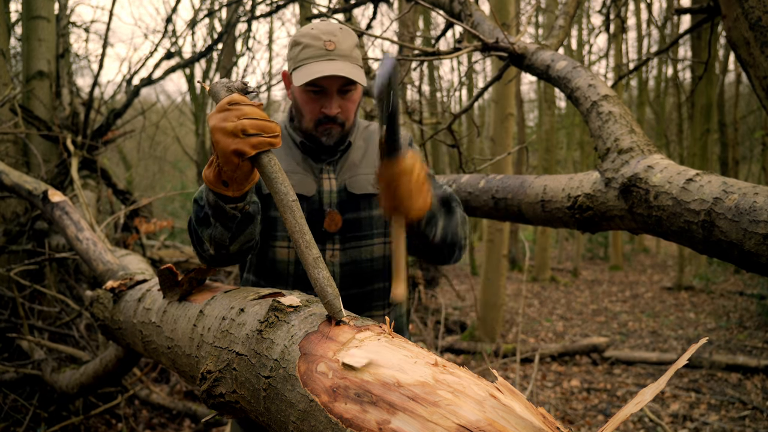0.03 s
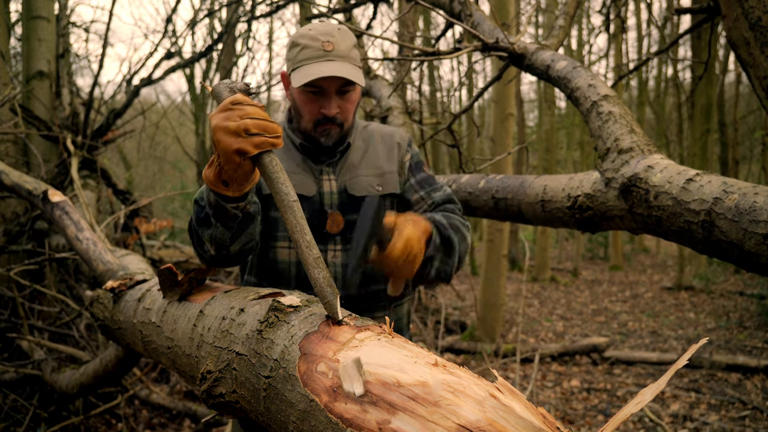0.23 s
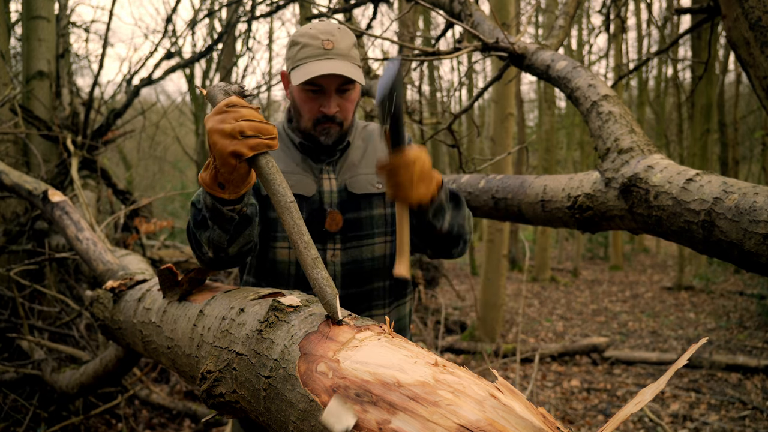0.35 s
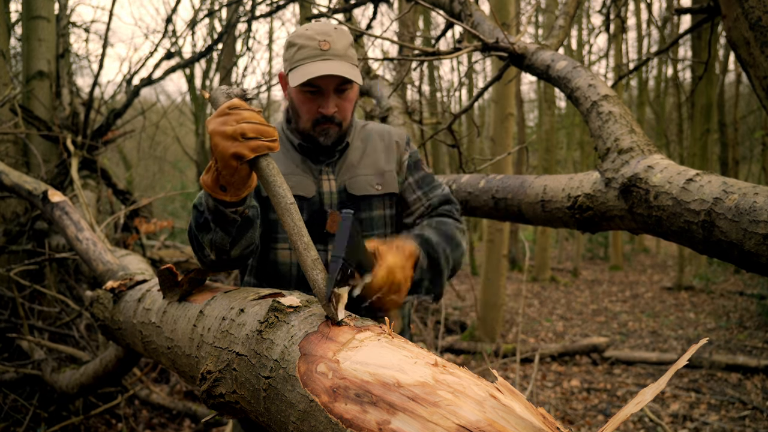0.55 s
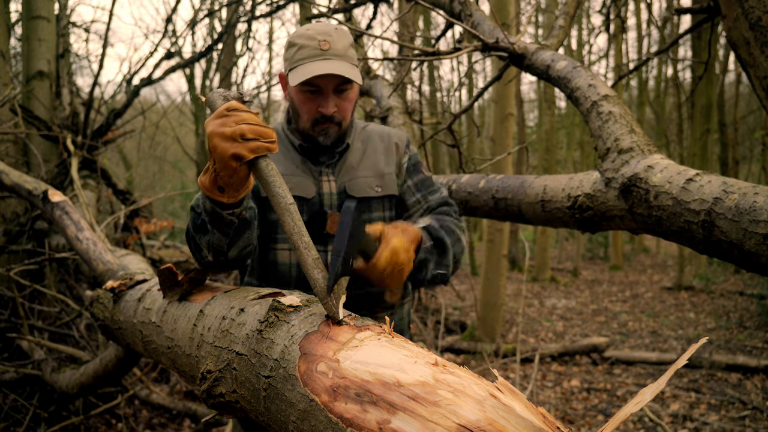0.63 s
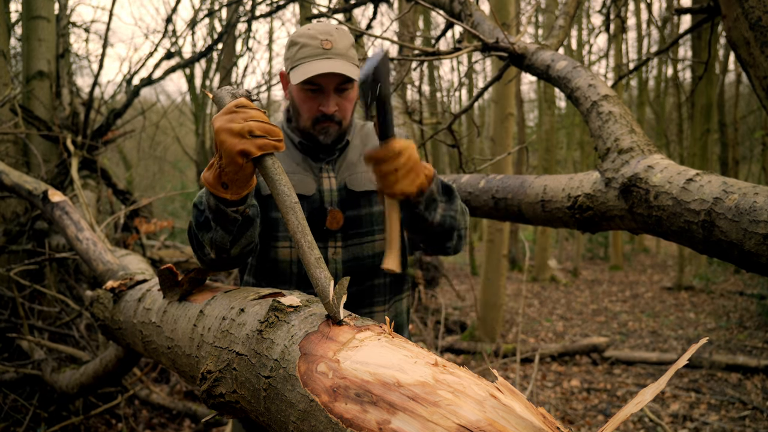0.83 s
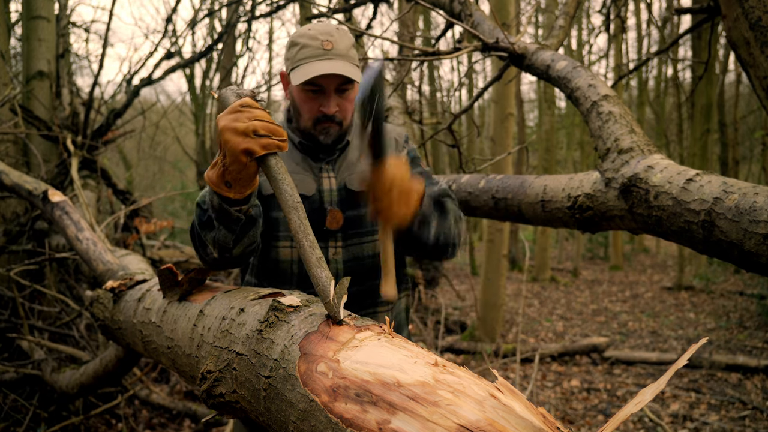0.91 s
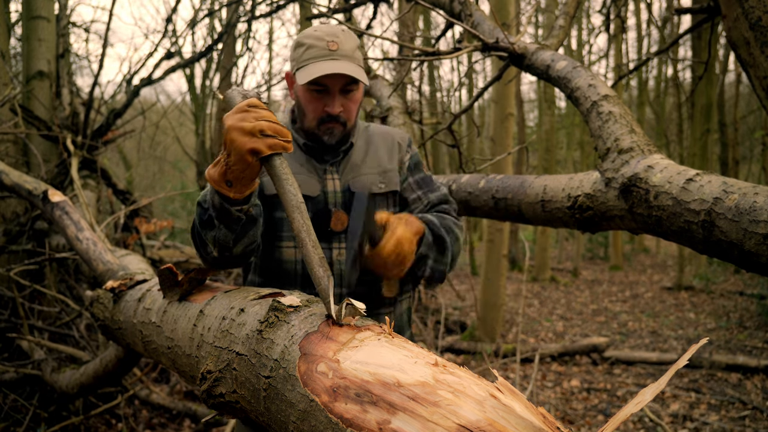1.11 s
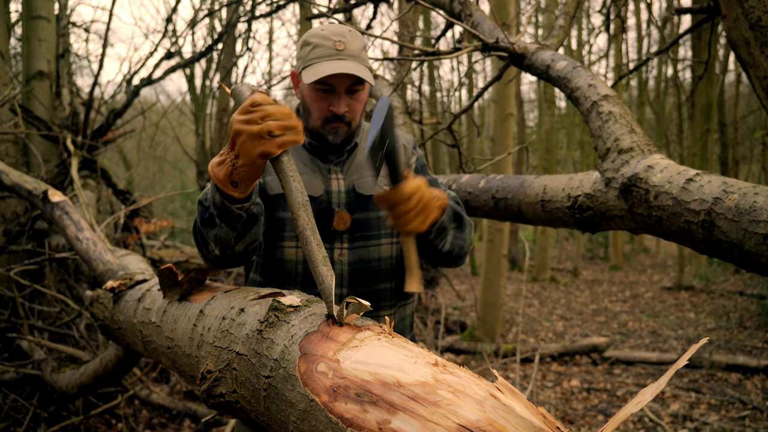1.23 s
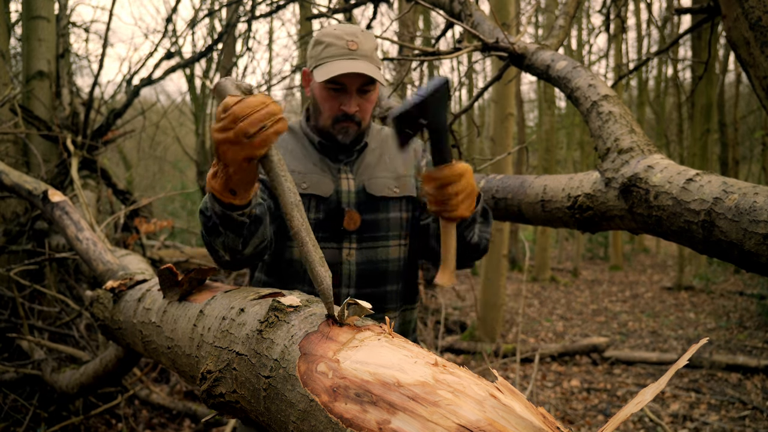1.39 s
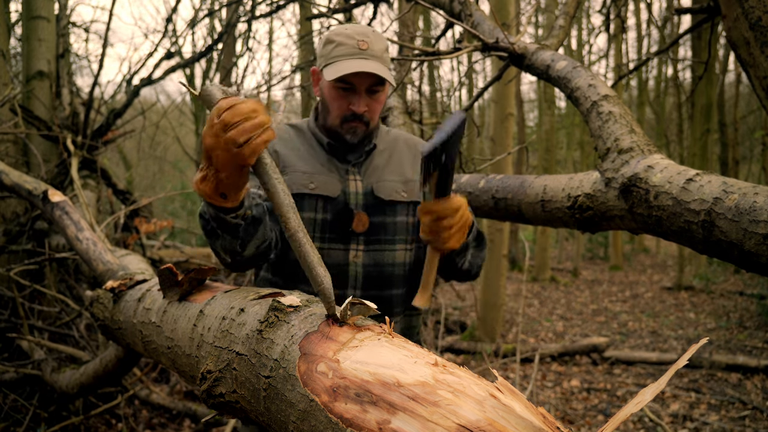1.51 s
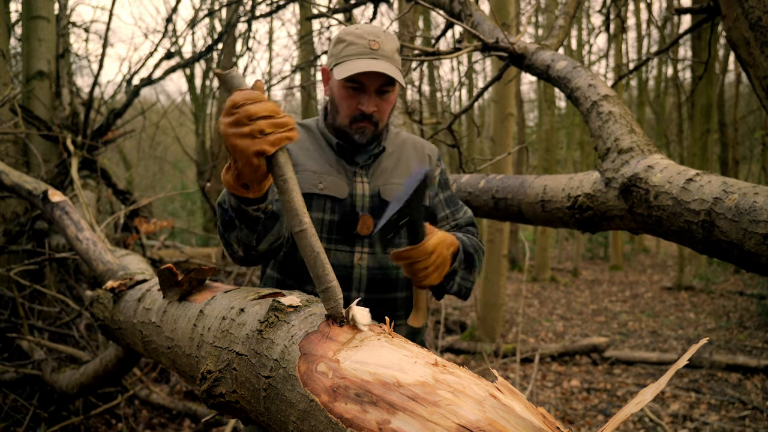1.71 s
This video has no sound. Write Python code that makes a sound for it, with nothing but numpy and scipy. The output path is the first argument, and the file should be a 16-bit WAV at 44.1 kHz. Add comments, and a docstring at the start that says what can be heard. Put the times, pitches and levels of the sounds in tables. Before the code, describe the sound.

Three crisp hatchet chops crack into wood, with small chips ticking down between the blows outdoors.

```python
"""In a woodland, a hatchet strikes a wooden stake three times on a log.
Each blow knocks stake and log, which ring as dying sines, and the edge tears fibres:
dense random cracks and single snaps excite a ring and a hiss. Chips tick and scatter as they land,
the trees return a faint echo made of sparse taps, leaves and cloth rustle in fine grains,
and a far, dull wash of shaped noise lies underneath."""
import sys
import numpy as np
from scipy import signal
from scipy.io import wavfile
from scipy.ndimage import uniform_filter1d

SR = 44100
rng = np.random.default_rng(int(sys.argv[2]) if len(sys.argv) > 2 else 0)


def materialize(psi):
    """Save the field psi as 16-bit PCM at rate SR to the path in sys.argv[1].

    A 1-D psi becomes a single channel; in a 2-D psi each row is a channel.
    """
    bounded = np.clip(np.atleast_2d(psi).T, -1, 1)
    quanta = np.round(bounded * 32767).astype(np.int16)
    wavfile.write(sys.argv[1], SR, quanta)


def gain_from_db(level_db):
    """Turn a decibel level (scalar or array-like) into a linear amplitude factor."""
    decades = np.asarray(level_db, float) / 20
    return 10 ** decades


N = 77175  # length of the scene in samples (1.75 s)


def evened(x):
    """Scales a sound to an average strength (rms) of 1."""
    return x / np.sqrt(np.mean(x ** 2) + 1e-20)


def read(points, hz):
    """Reads a table by pitch, with straight lines between points on a log-frequency axis."""
    f, value = np.transpose(points)
    return np.interp(np.log(hz + 1), np.log(f + 1), value)


def curve(points):
    """Reads a table by time, giving one value for every sample."""
    return np.interp(np.arange(N) / SR, *np.transpose(points))


def add(mix, start_s, sound):
    """Mixes a sound in at its start time, cutting what runs past the end."""
    part = mix[round(start_s * SR):][:len(sound)]
    part += sound[:len(part)]


def causal(x, spectrum):
    """Filters with the given spectrum; minimum phase, so nothing sounds before its cause."""
    hz = abs(np.fft.fftfreq(4096, 1 / SR))
    gain_db = np.maximum(read(spectrum, hz), -100)
    log_gain = np.log(gain_from_db(gain_db))
    taps = np.fft.ifft(np.exp(np.conj(signal.hilbert(log_gain)))).real[:2048]
    return signal.oaconvolve(x, taps)[:len(x)]


def coloured(x, spectrum):
    """Filters with the given spectrum, then scales to rms 1."""
    return evened(causal(x, spectrum))


def crackle(size, per_s, spread_db):
    """Makes random clicks of either sign, a few of them large."""
    chance, rarity, side = rng.random((size, 3)).T
    click_size = gain_from_db(spread_db * np.minimum(-np.log(rarity + 1e-9), 4))
    return (chance < per_s / SR) * click_size * np.sign(side - .5)


def ringing(modes):
    """Sums the dying sines of a struck body, each with its own pitch, level and decay."""
    t = np.arange(SR // 4) / SR
    return sum(gain_from_db(db - 60 * t / t60) * np.sin(2 * np.pi * hz * t) for hz, db, t60 in modes)


def burst(hz, cycles):
    """Makes a ring that swells and dies within a few cycles."""
    turns = np.arange(1500) * hz / SR
    u = 4.0 * turns / max(cycles, .5)
    return u * np.exp(1 - u) * np.sin(2 * np.pi * turns)


# How stake and log ring when struck: pitch_hz, level_db, t60_s (time to fall by 60 dB)
WOOD_MODES = [(115, -6, .14), (160, -8, .14), (245, -3, .1), (200, -8, .13), (345, -7, .11), (440, -2, .04),
              (520, 0, .04), (630, -3, .04), (830, -6, .025), (950, -5, .025), (1150, -6, .025),
              (1570, -2, .03), (1940, -9, .02), (2400, -10, .015)]
# Knocks of blade on stake and stake on log:
# start_s, peak_db, contact_s, best_hz (modes hit best), breadth_octaves (around best_hz)
BLOW_KNOCKS = [(.2364, -18, .0012, 600, 1.2), (0.2426, -20, 0.0015, 400, 1.), (.2469, -7, .0011, 520, 1.2),
               (0.2523, -19, 0.00088, 800, 1.3), (0.2604, -21, 0.0014, 550, .8),
               (.286, -37, 0.0018, 345, .6), (.6678, -13, .0006, 800, 1.4), (.6715, -21, .001, 600, 1.1),
               (.684, -36, .002, 170, .9), (1.1021, -19, 0.00048, 950, .2), (1.1035, -17, .0004, 1570, .25),
               (1.1045, -18, .0009, 450, .2), (1.1248, -31, .0018, 250, 1.), (0.8516, -51, .0012, 400, 1.),
               (1.3935, -47, .0005, 1000, 1.1), (1.401, -49, .0005, 1200, .9), (.33, -44, .002, 220, .9)]


def knock(peak_db, contact_s, best_hz, octaves):
    """A smooth push during contact rings the wood, most strongly in the modes near best_hz."""
    detune = .015  # each knock meets the wood a little differently (fraction of pitch)
    force = np.sin(np.pi * np.minimum(np.arange(200) / SR / contact_s, 1)) ** 2
    push = np.diff(force)
    hz, db, t60 = np.transpose(WOOD_MODES)
    octaves_away = np.log2(hz / best_hz)
    db = db - 6.0 * (octaves_away / max(octaves, .15)) ** 2
    hz = hz * (1 + detune * rng.standard_normal(len(hz)))
    sound = np.convolve(ringing(zip(hz, db, t60)), push)
    return gain_from_db(peak_db) * sound / abs(sound).max()


# Single loud fibre snaps: start_s, level_db, pitch_hz, length_cycles
FIBRE_SNAPS = [(.2383, -15, 3100, 6.), (.2405, -13, 3300, 8.), (.2471, -17, 3500, 5.),
               (.6696, -12, 6800, 6.), (.6702, -15, 3400, 8.), (.6722, -8, 4500, 1.6),
               (.6737, -6, 4300, 1.6), (1.1082, -14, 3340, 14.), (1.1145, -18, 3400, 9.),
               (1.118, -18, 5400, 10.)]


def snap(level_db, pitch_hz, cycles):
    """One fibre breaks with a ring of a few cycles."""
    return gain_from_db(level_db) * burst(pitch_hz, cycles)


# Colour of the splinter hiss: pitch_hz, level_db (per Hz; only the shape counts)
SPLINTER_COLOUR = [(710, -44.5), (1200, -17), (2170, -22), (3050, 1), (3400, 7), (4000, -0.5), (5120, -5.5),
                   (7060, -5), (10800, -27.5), (14500, -43), (15600, -61.5)]
# The edge tearing through wood: start_s, length_s, level_db, ring_hz, hiss_db (against the ring)
WOOD_TEARS = [(.2355, .002, -36, 3100, 0), (.2376, .007, -18, 3150, 1.5), (0.2436, .0045, -26, 3310, -6),
              (.667, .002, -27, 3500, 2), (.669, .005, -24, 3418, 5), (0.6744, .0045, -32, 4200, 5),
              (1.1018, .002, -34, 4800, 0), (1.1037, .0075, -23, 3200, 0), (1.1113, .009, -25, 3350, 0),
              (1.1204, .0038, -33, 3250, 2)]


def tear(length_s, level_db, ring_hz, hiss_db):
    """Dense fibre cracks excite the blade's narrow ring and a wide splinter hiss."""
    rise_s, t60_s, ring_width_hz = .0008, .012, 380
    t = np.arange(2600) / SR
    cracks = crackle(len(t), per_s=12000, spread_db=3.0)
    ring = np.exp(-np.pi * ring_width_hz * t[:400]) * np.sin(2 * np.pi * ring_hz * t[:400])
    rung = evened(np.convolve(cracks, ring)[:len(t)])
    hiss = gain_from_db(hiss_db) * coloured(cracks, SPLINTER_COLOUR)
    fade_db = -60 * np.maximum(t - length_s, 0) / t60_s
    shape = np.minimum(t / rise_s, 1) * gain_from_db(level_db + fade_db)
    return shape * (rung + hiss)


# Colour of the scattering grit before each chip tilts it: pitch_hz, level_db (per Hz; only the shape counts)
GRIT_COLOUR = [(590, -32.5), (1000, -1.5), (2540, -2.5), (3630, -5.5), (4160, -3.5), (7150, -8.5),
               (10800, -19.5), (15600, -43.5)]
# Chips and bits of bark landing: start_s, level_db, ring_hz, scatter_t60_s,
# scatter_db (against level_db), treble_db (above -12 is brighter grit, below is duller)
CHIP_LANDINGS = [(.1304, -53, 1650, .03, -9, -16), (.5298, -52, 1890, .04, -9, -22),
                 (.6037, -38, 2450, .045, -9, -12), (.853, -51, 4500, .07, -3, -9),
                 (.9352, -36, 1845, .025, -15, -18), (.9425, -52, 2500, .05, -5, -12),
                 (.9635, -58, 5000, .035, -5, -10), (1.062, -57, 6000, .015, -6, -7),
                 (1.071, -54, 6000, .02, -6, -7), (1.2027, -49, 3530, .04, -6, -11),
                 (1.2725, -56, 1924, .02, -7, -12), (1.3342, -39, 2430, .035, -12, -13),
                 (1.3583, -43, 1690, .035, -8, -5), (1.3866, -44, 5500, .02, -8, -11),
                 (1.3928, -44, 1600, .06, -9, -24), (1.4248, -48, 7000, .02, -10, -11),
                 (1.511, -51, 6500, .025, -7, -10), (1.6091, -55, 6000, .04, -4, -6)]


def chip(level_db, ring_hz, t60_s, scatter_db, treble_db):
    """A small two-pitch tick comes with a dying scatter of grit, brighter or duller."""
    typical_treble_db, tick_db = -12, -7
    first_touch = 3.0  # click at the first touch, in sizes of the smallest grain
    t = np.arange(4000) / SR
    tilt_db = (treble_db - typical_treble_db) / 1.3  # per octave, around 3500 Hz
    colour = [(hz, db + tilt_db * np.log2(hz / 3500)) for hz, db in GRIT_COLOUR]
    grains = crackle(len(t), per_s=9000, spread_db=4.4) + first_touch * (t == 0)
    sound = coloured(grains, colour) * gain_from_db(scatter_db - 60 * t / t60_s)
    tick = burst(ring_hz, 5.5) + burst(1.7 * ring_hz, 3.5)
    add(sound, 0, gain_from_db(tick_db) * tick)
    return gain_from_db(level_db) * sound


# How long the echo lasts at each pitch: pitch_hz, t60_s (time to fall by 60 dB)
ECHO_DECAY = [(200, .3), (1000, .3), (3000, .3), (8000, .25), (14000, .1)]
# What the trunks send back: pitch_hz, level_db
ECHO_COLOUR = [(100, -3), (600, 0), (2000, 5), (3400, -9), (5500, 3), (7500, -1), (10000, 3), (14000, -20)]


def woods(x):
    """Trunks echo the near sounds as sparse taps, each band dying at its own speed."""
    level_db, build_s = -40, .03
    taps = np.zeros(SR // 2)
    at = np.arange(300, len(taps) - 20, 20)
    taps[at + rng.integers(0, 20, len(at))] = rng.choice([-1., 1.], len(at))
    taps *= 1 - np.exp(-np.arange(len(taps)) / SR / build_s)
    hz, t, z = signal.stft(taps, SR, nperseg=256)
    fade_db = -60 * t / read(ECHO_DECAY, hz)[:, None]
    gain = gain_from_db(read(ECHO_COLOUR, hz)[:, None] + fade_db)
    tail = signal.istft(z * gain, SR, nperseg=256)[1]
    tail = tail / np.linalg.norm(tail)
    return gain_from_db(level_db) * signal.fftconvolve(x, tail)[:N]


# Colour of leaves and cloth: pitch_hz, level_db (per Hz; only the shape counts)
RUSTLE_COLOUR = [(530, -29), (900, -4), (1260, -10.5), (1500, -5.5), (2000, -11), (2200, -10.5),
                 (3730, -14), (7630, -17.5), (15600, -46)]
# How loud the rustle is over time: time_s, level_db
RUSTLE_LOUDNESS = [(0, -82.5), (.28, -83.5), (.31, -68), (.34, -82), (.55, -77.5), (.75, -74.5), (1.0, -76),
                   (1.17, -74.5), (1.2, -62), (1.24, -70), (1.36, -69.5), (1.4, -59), (1.47, -63.5),
                   (1.6, -63.5), (1.64, -71), (1.72, -68), (1.75, -61)]


def rustle():
    """Leaves and cloth rub in many fine random grains as the man moves."""
    grains = crackle(N, per_s=9000, spread_db=2.8)
    return gain_from_db(curve(RUSTLE_LOUDNESS)) * coloured(grains, RUSTLE_COLOUR)


# Colour of the far wash: pitch_hz, level_db (per Hz; only the shape counts)
WASH_COLOUR = [(12, -49), (20, -17), (90, -10.5), (208, -3), (325, -3), (749, -2.5), (1350, -7.5),
               (1830, -25.5), (3280, -23), (4100, -27), (6590, -33), (15600, -39.5)]
# Slow rise and fall of the wash: time_s, level_db (only the change from the first point counts)
WASH_LEVEL = [(0.0, -64), (0.32, -59.5), (0.872, -62.5), (1.144, -60.5), (1.306, -59.5), (1.75, -58.5)]


def wash():
    """Wind and traffic blend far off into dull noise with drifting patches of pitch and time."""
    start_db, patch_db = -62, 1.6
    frames, hz = N // 256 + 5, np.fft.rfftfreq(1024, 1 / SR)
    a, b, patches = rng.standard_normal((frames, 513, 3)).T
    patches = uniform_filter1d(patches, 10, 0)  # smooth across pitch
    patches = evened(uniform_filter1d(patches, 12, 1))  # smooth across time
    z = (a + 1j * b) * gain_from_db(read(WASH_COLOUR, hz)[:, None] + patch_db * patches)
    noise = evened(signal.istft(z, nperseg=1024, noverlap=768)[1][:N])
    swell_db = curve(WASH_LEVEL)
    return gain_from_db(start_db + swell_db - swell_db[0]) * noise


def scene():
    """Places blows and chips in time, then adds the echo and the background."""
    near = np.zeros(N)
    for table, source in [(BLOW_KNOCKS, knock), (FIBRE_SNAPS, snap), (WOOD_TEARS, tear), (CHIP_LANDINGS, chip)]:
        for start_s, *settings in table:
            add(near, start_s, source(*settings))
    return (near + woods(near) + rustle() + wash())[None]


def band_limit(x):
    """A steep low-pass at the top of the band."""
    return signal.sosfilt(signal.butter(12, 15780, fs=SR, output="sos"), x)


# What the microphone lets through: pitch_hz, level_db
MIC_RESPONSE = [(15, -30), (40, -12), (75, -5), (110, 0), (9000, 0), (13000, -2), (16000, -10)]


def record(dry):
    """The microphone weakens the deepest and highest pitches of the finished mix."""
    mix = causal(dry[0], MIC_RESPONSE)[None]
    return band_limit(mix)


dry = scene()
out = record(dry)
materialize(out)
```